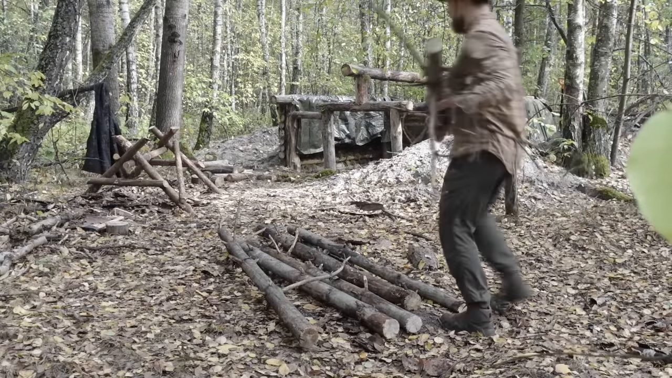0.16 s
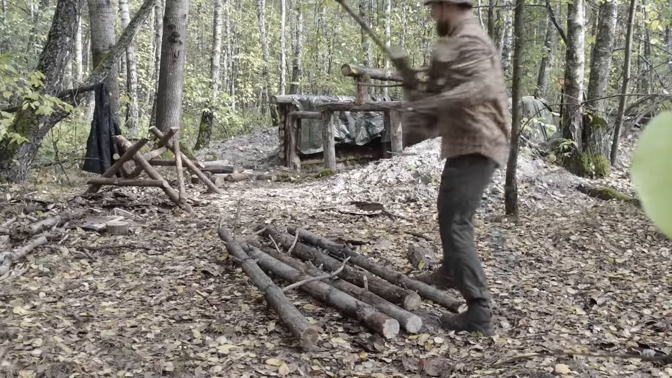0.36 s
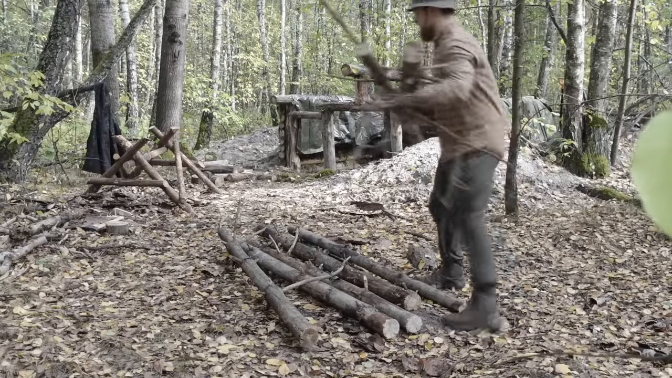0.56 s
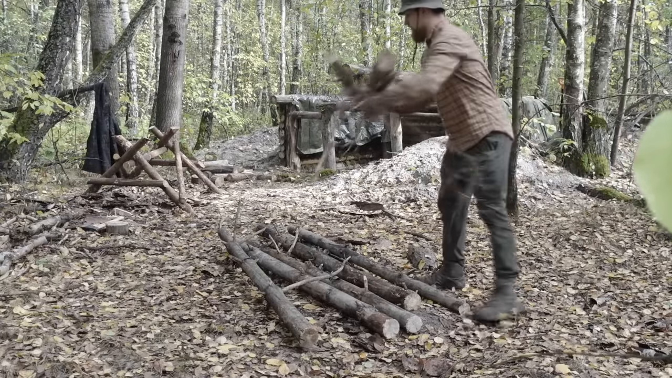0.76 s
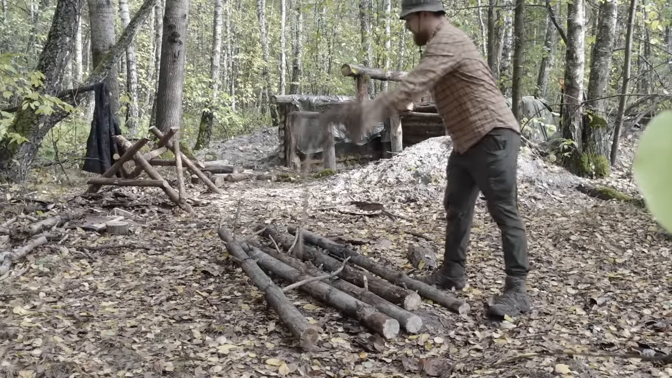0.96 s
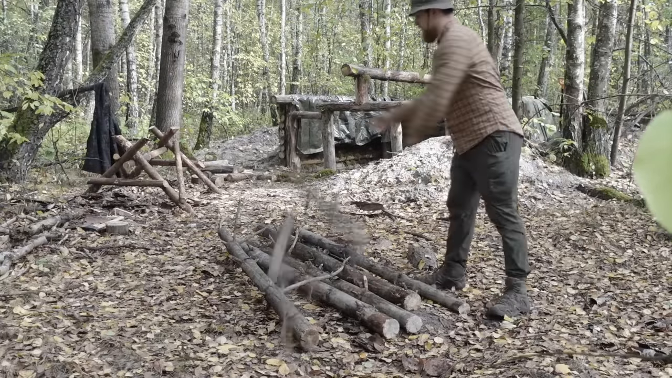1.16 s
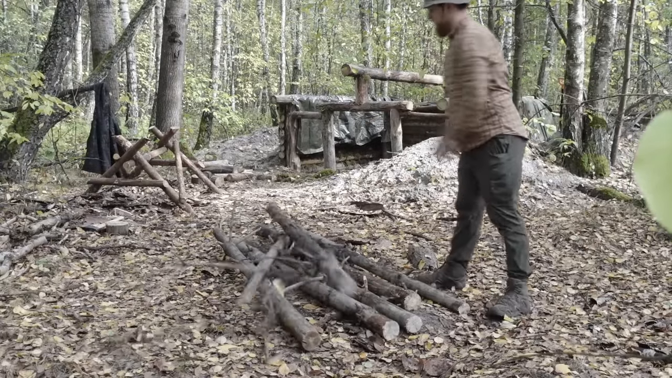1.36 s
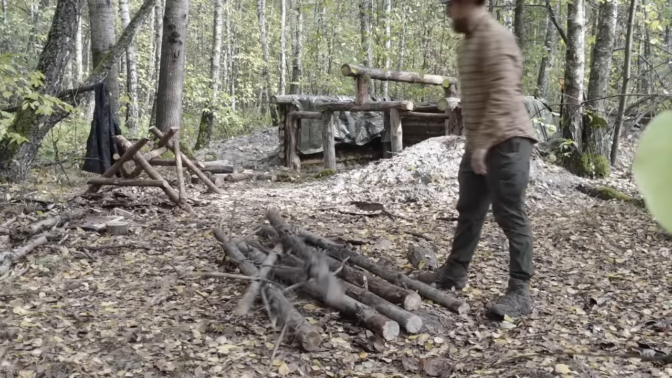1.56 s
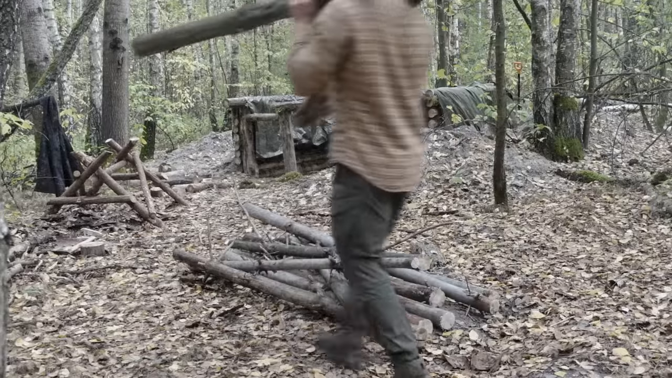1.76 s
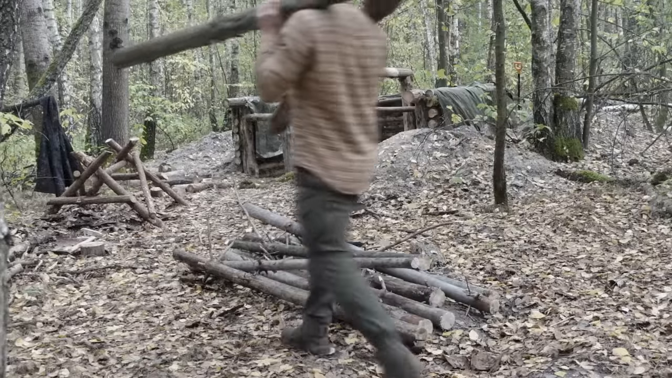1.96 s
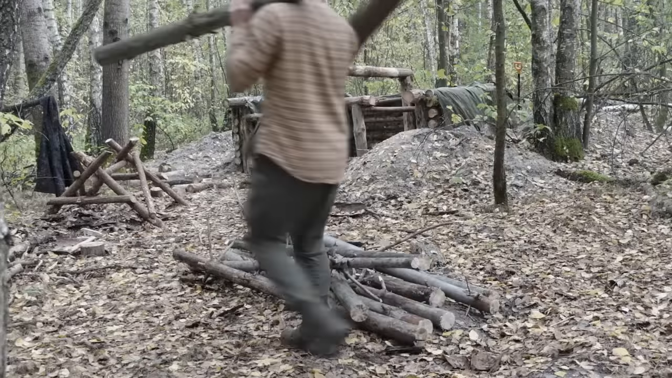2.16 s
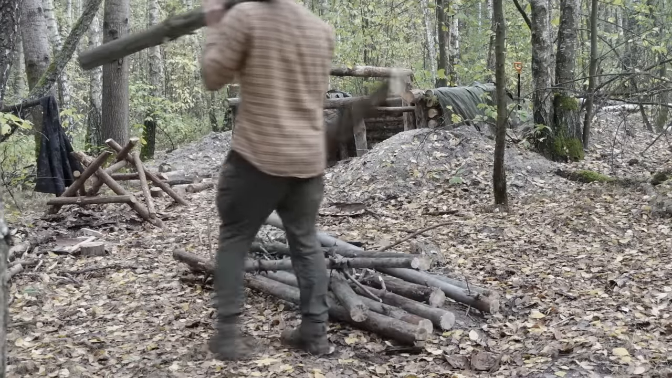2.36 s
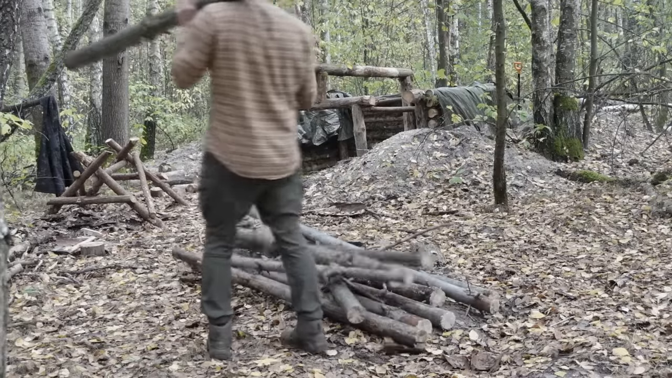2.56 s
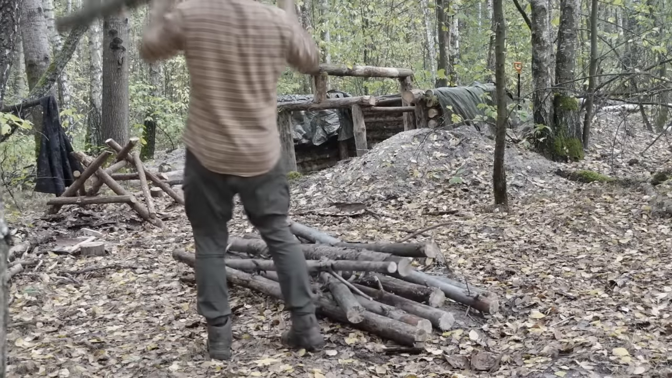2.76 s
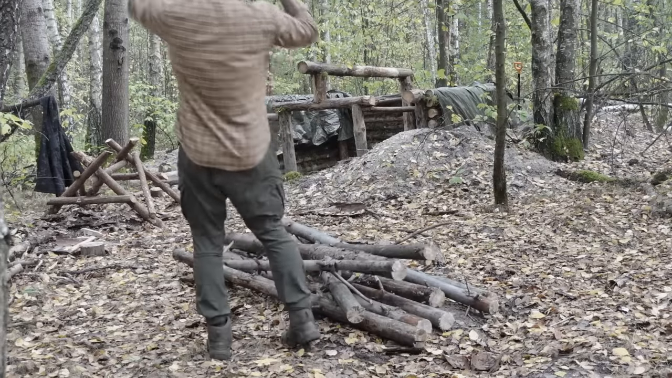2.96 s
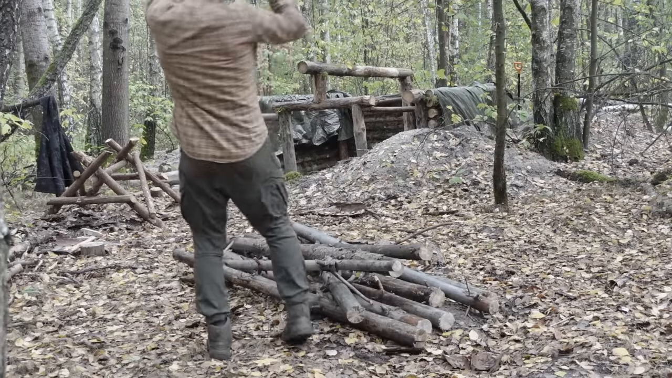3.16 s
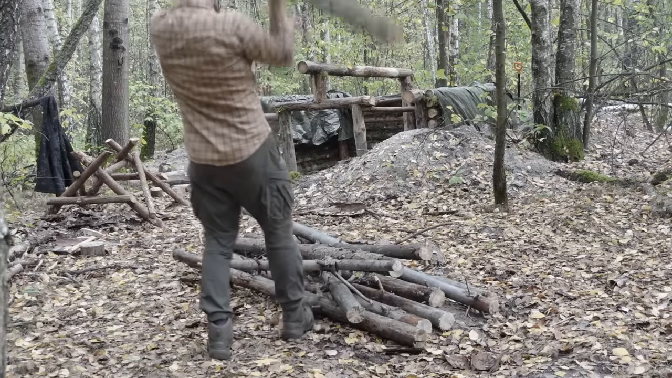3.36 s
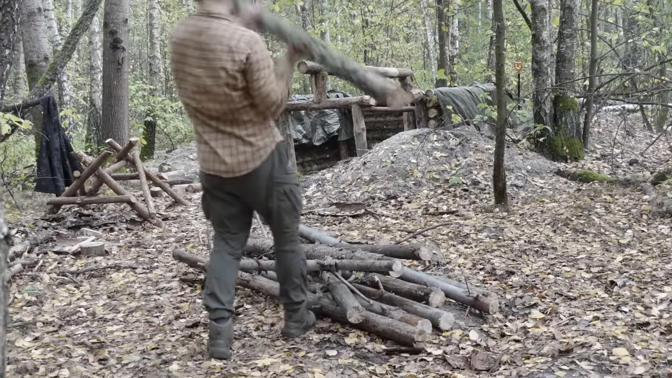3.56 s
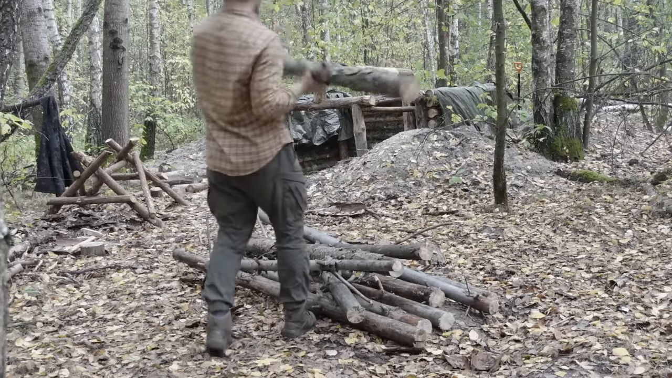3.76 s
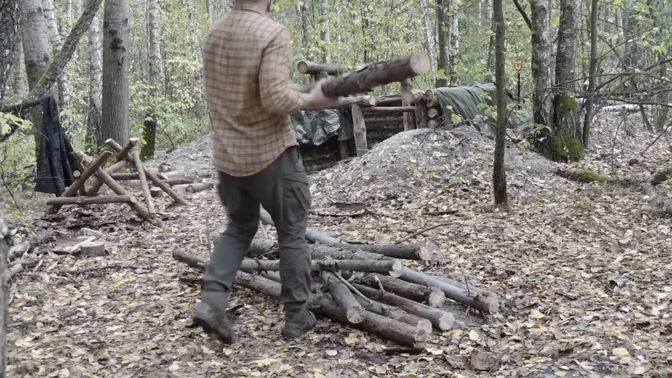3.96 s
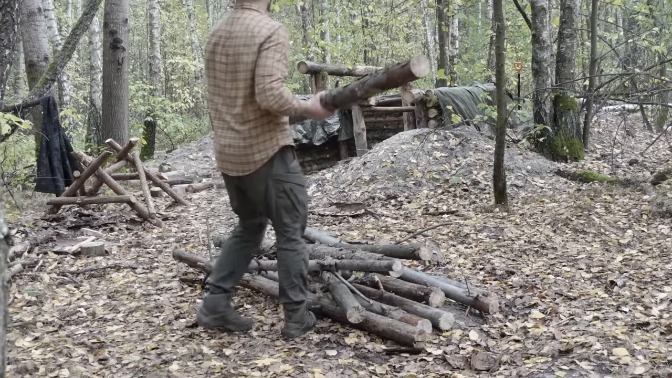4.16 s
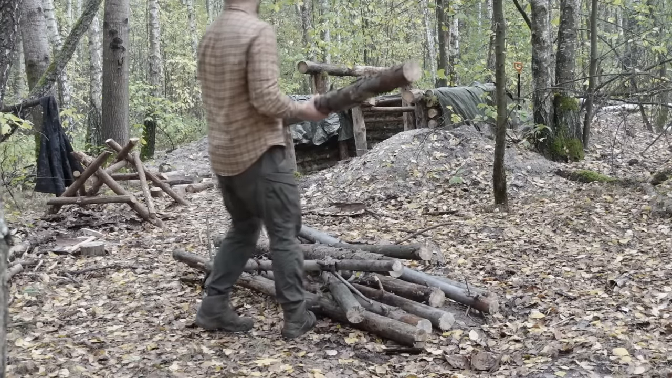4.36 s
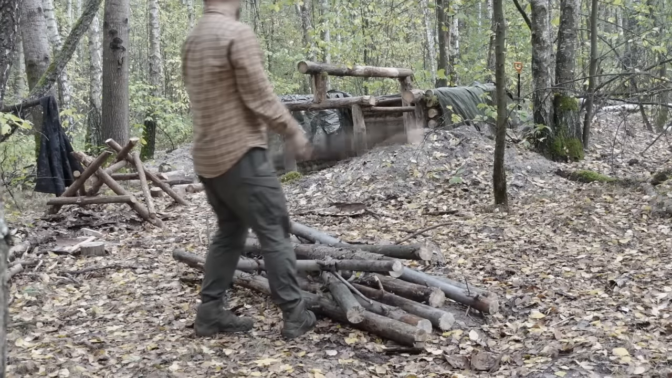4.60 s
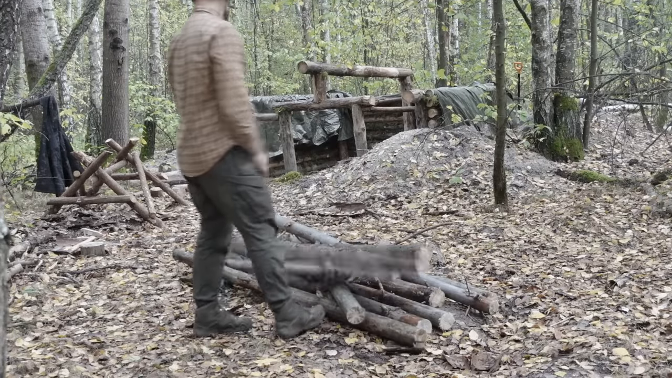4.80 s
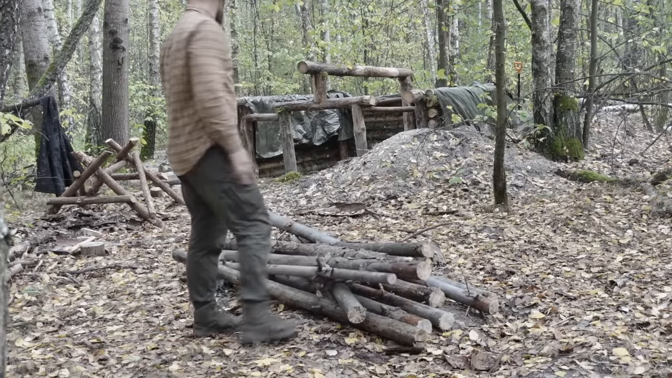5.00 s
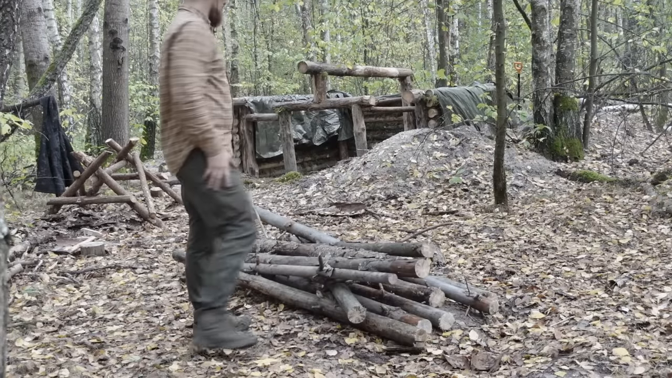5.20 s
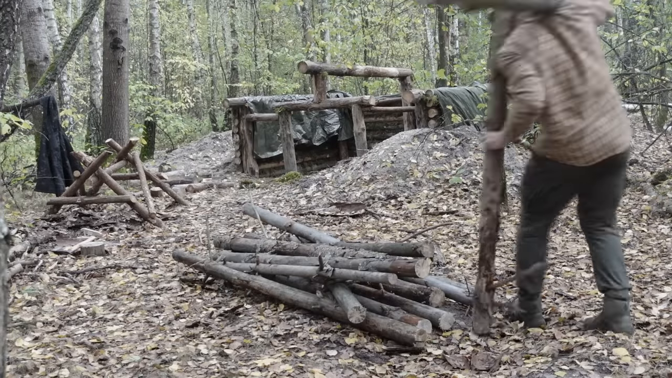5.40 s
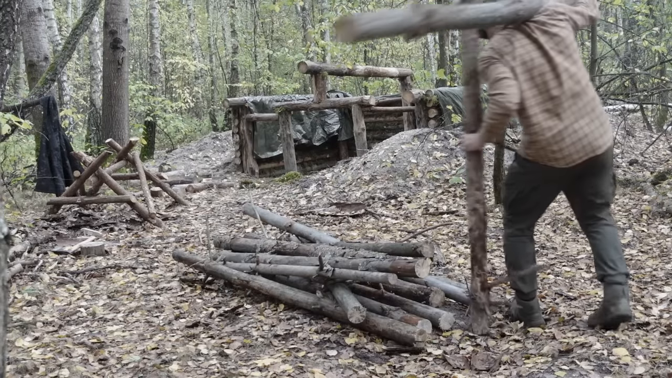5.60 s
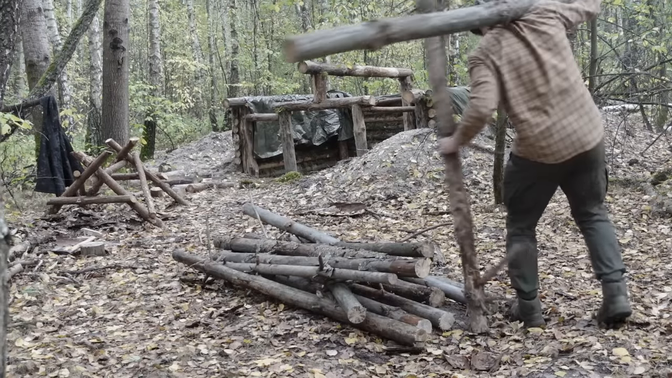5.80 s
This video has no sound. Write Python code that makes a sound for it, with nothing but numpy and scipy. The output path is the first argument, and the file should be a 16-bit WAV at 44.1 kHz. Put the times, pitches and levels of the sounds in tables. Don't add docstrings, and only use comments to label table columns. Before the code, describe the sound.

In a quiet forest, cloth and dry leaves rustle softly with tiny twig ticks. A log crashes onto a log pile with hard hollow knocks and cracking bark, a second lands just over a second later with a lighter touch first, then after a pause of small rustles a third clacks down. Each has a brief tree echo. The microphone is fairly close, mono, with loudest peaks slightly flattened.

```python
import sys
import numpy as np
from scipy import signal
from scipy.fft import rfft, irfft
from scipy.io import wavfile
from scipy.ndimage import uniform_filter1d

SR = 44100
rng = np.random.default_rng(int(sys.argv[2]) if len(sys.argv) > 2 else 0)


def wav_record(signal):
    frames = np.transpose(np.atleast_2d(signal))
    bounded = np.clip(frames, -1, 1)
    quanta = np.round(bounded * 32767).astype(np.int16)
    wavfile.write(sys.argv[1], SR, quanta)


def makeup_ratio(level_db):
    decades = np.asarray(level_db, float) / 20
    return 10 ** decades


N = 257544


def decay(t60_s, length_s):
    return np.exp(-np.log(1000) * np.arange(int(length_s * SR)) / SR / t60_s)


def unit(x):
    return x / np.sqrt(np.mean(x ** 2))


def colour(x, points):
    hz, db = np.transpose(points)
    f = np.maximum(np.arange(len(x) // 2 + 1) * SR / len(x), 1)
    gain = makeup_ratio(np.interp(np.log(f), np.log(hz), db))
    return irfft(rfft(x) * gain, len(x))


def band(x, lo_hz, hi_hz):
    sos = signal.butter(2, [lo_hz, min(hi_hz, .45 * SR)], "band", fs=SR, output="sos")
    return signal.sosfilt(sos, x)


def add(out, start_s, sound):
    i = int(start_s * SR)
    out[i:i + len(sound)] += sound[:len(out) - i]


def curve(tables):
    t = np.arange(N) / SR
    rows = map(np.array, tables)
    return sum(makeup_ratio(np.interp(t, r[:, 0], r[:, 1], -200, -200)) for r in rows)


def walk(rate_hz):
    k = int(SR / rate_hz)
    return uniform_filter1d(np.repeat(rng.standard_normal(N // k + 1), k), k)[:N]


def grains(rate_hz, scatter_db):
    size = makeup_ratio(scatter_db * rng.exponential(size=N)) * rng.standard_normal(N)
    return size * (rng.random(N) < rate_hz / SR)


def choked(table, t60_at_0db_s, gain_per_db):
    return [(*row, t60_at_0db_s * np.exp(-gain_per_db * row[1])) for row in table]


def knocks(table, rise_cycles, pair_db, spread):
    out, t = np.zeros(N), np.arange(SR // 3) / SR
    for (s, db, hz, t60), (a, b, c) in zip(table, rng.random((len(table), 3))):
        push = np.sin(np.pi / 2 * np.minimum(t * hz / rise_cycles, 1)) ** 2
        ratios = (1 + spread * (0.27 + a), 1 - spread * (.4 + b) / 2)
        near = sum(np.sin(2 * np.pi * (hz * ratio * t + c)) for ratio in ratios)
        near = makeup_ratio(pair_db) * near * decay(max(1.4 * t60, .004), 1 / 3)
        ring = np.sin(2 * np.pi * hz * t) + near
        add(out, s, makeup_ratio(db) * push * decay(max(t60, .004), 1 / 3) * ring)
    return out


def cracks(table, spread):
    out, span = np.zeros(N), SR // 10
    rise = np.minimum(np.arange(span) / SR / 0.0013, 1) ** 2
    for (s, db, hz, *treble_db, t60), noise in zip(table, rng.standard_normal((len(table), 2, span))):
        snap = decay(max(.36 * t60, .002), 1 / 10)
        crumble = decay(max(2.2 * t60, .002), 1 / 10)
        burst = unit(band(noise[0], hz / spread, hz * spread)) * (snap + makeup_ratio(-13) * crumble)
        for rel_db in treble_db:
            tick = unit(band(noise[1], 5500, 16500)) * (snap + makeup_ratio(-18) * crumble)
            burst = burst + makeup_ratio(rel_db + 8) * tick
        add(out, s, makeup_ratio(db - 1.4) * rise * burst)
    return out


def pings(table, t60_cycles):
    out, t, rise_s = np.zeros(N), np.arange(SR // 8) / SR, .0006
    rise = np.sin(np.pi / 2 * np.minimum(t / rise_s, 1)) ** 2
    for s, db, hz in table:
        fall_db = 60 * np.maximum(t - rise_s, 0) * hz / t60_cycles
        add(out, s, makeup_ratio(db + 1.5 - fall_db) * rise * np.sin(2 * np.pi * hz * t))
    return out


# start_s, peak_db, ring_hz
LOG_KNOCKS = [(0.46, -35, 670), (1.242, -35, 506), (1.293, -2.5, 502), (1.317, -13.5, 455),
              (1.345, 1.5, 437.4), (1.412, -16, 456), (1.607, -36, 460), (1.662, -42.5, 434),
              (2.53, -19.5, 645), (2.584, -27, 690), (2.623, -5.5, 385), (2.631, -9, 533),
              (2.641, -8.5, 562), (2.652, -14, 407), (2.671, -15, 569), (2.693, -11.5, 421),
              (2.711, -11, 540), (2.789, -24, 346), (2.829, -37, 590), (3.118, -32, 580), (4.896, -9, 600),
              (4.908, -4, 512), (4.925, -7, 706), (4.933, -10, 567), (4.965, -13, 540)]
# start_s, peak_db, ring_hz
LOG_OVERTONES = [(1.24, -35, 755), (1.292, -14, 740), (1.317, -15, 1050), (1.345, -2.5, 800),
                 (1.384, -17, 800), (1.424, -30, 1000), (1.47, -28, 717), (2.533, -21, 880),
                 (2.552, -23, 865), (2.641, -12, 1150), (2.7, -18, 733), (2.75, -35, 840),
                 (2.816, -34.5, 733), (2.919, -38, 814), (4.895, -11, 675), (4.908, -7, 1104),
                 (4.933, -10, 856)]
# start_s, peak_db, ring_hz
END_CLACKS = [(1.263, -31, 1180), (1.294, -22, 1250), (1.3166, -14, 2520), (1.3379, -14.5, 1550),
              (1.351, -13.5, 1650), (1.4691, -22, 1990), (1.4762, -23, 1960), (2.5334, -25, 1230),
              (2.5512, -32, 1190), (2.6201, -9, 1730), (2.697, -17, 1200), (2.6464, -8, 2230),
              (2.6544, -9, 1170), (2.6683, -17, 1440), (2.7134, -5, 1300), (2.7514, -30, 1430),
              (2.817, -31, 1500), (2.8903, -39, 1233), (4.9092, -8.5, 1350), (4.9196, -8.5, 1163),
              (4.9302, -19, 1470), (4.9484, -17, 2486), (4.968, -22, 1260), (2.921, -37, 1400),
              (3.1, -43, 880)]


def log_knocks():
    main = knocks(choked(LOG_KNOCKS, .045, .014), 1.0, -9.5, .2)
    second = knocks(choked(LOG_OVERTONES, .035, .025), 1.4, -2.5, .19)
    ends = knocks(choked(END_CLACKS, .03, .025), 1.3, -2.0, .3)
    return main + second + ends


# start_s, peak_db, ring_hz, t60_s
GROUND_THUMPS = [(0.4435, -31, 560, 0.02), (1.296, -25, 189, 0.1), (1.354, -24, 230, 0.18),
                 (1.371, -14, 98, 0.15), (1.39, -22, 214, 0.27), (1.464, -30.5, 218.5, 0.38),
                 (1.545, -46, 215, 0.37), (1.934, -50, 217, 0.12), (2.52, -27, 221.5, 0.15),
                 (2.551, -28.5, 220, 0.3), (2.628, -18, 241.4, 0.15), (2.664, -28, 227.4, 0.23),
                 (0.46, -37, 300, 0.07), (4.963, -32, 184.4, 0.26)]
# start_s, peak_db, ring_hz, t60_s
LOG_THUDS = [
    (1.291, -17.5, 358, 0.2),
    (1.375, -28, 305, 0.1),
    (2.5205, -14.5, 287, 0.045),
    (2.619, -14.5, 325, 0.068),
    (2.663, -17.5, 240.4, 0.15),
    (2.788, -22, 336, 0.039),
    (3.12, -39, 410, 0.15),
    (4.897, -12, 330, 0.09),
    (5.014, -30, 341, 0.1),
]
# start_s, peak_db, ring_hz, t60_s
FREE_RINGS = [(1.343, -8, 275, .15), (1.357, -9.5, 839, 0.16), (1.351, -10, 443, 0.051),
              (1.378, -3, 453.6, 0.076), (1.47, -27, 500, 0.17), (2.535, -19.5, 3250, 0.027),
              (.465, -39, 520, .09), (2.714, -9, 1960, 0.024), (2.795, -20.5, 494, .06),
              (3.117, -25.5, 1060, 0.055), (3.117, -30, 1490, 0.07), (3.134, -29, 570, 0.09),
              (3.152, -34, 1020, 0.059), (3.152, -40, 1464, .05), (4.95, -5, 540, 0.125),
              (4.945, -23, 350, 0.15)]


def low_thuds():
    thumps = knocks(GROUND_THUMPS, 0.6, -11.5, .35)
    thuds = knocks(LOG_THUDS, 0.57, -13, .15)
    return thumps + thuds + knocks(FREE_RINGS, 2.7, -18.5, .1)


# start_s, peak_db, centre_hz, treble_db
BARK_CRACKS = [(1.209, -26, 4800, -17), (1.2428, -20, 6500, -14), (1.2518, -25, 4200, -35),
               (1.2622, -21, 4500, -21), (1.296, -10, 2440, -20.5), (1.3167, -1, 3300, -15),
               (1.3245, -8, 4000, -19), (1.3376, -8, 2480, -17), (1.354, -2, 5600, -20),
               (1.3614, -8, 5000, -19.5), (1.3763, -13, 6000, -21), (1.461, -19, 3400, -19),
               (1.4685, -16, 2400, -19), (2.5214, -24, 2640, -19), (2.5333, -18, 3060, -24),
               (2.5607, -25, 2720, -26.5), (2.6169, -16, 2550, -17.5), (2.6226, 1.5, 3900, -14),
               (2.6264, -3, 4200, -30), (2.646, -3, 4200, -20), (2.6584, -17, 8650, -6.5),
               (2.663, -10, 3600, -26), (2.6884, -21, 5870, -25), (2.7076, -19, 3600, -18),
               (4.8897, -18, 7000, -14), (4.9097, -6, 3200, -14), (4.9193, 1, 4000, -15),
               (4.9297, -10, 4800, -19), (4.946, -13, 3200, -15), (4.9604, -19, 5000, -14)]
# start_s, peak_db, centre_hz
BARK_SCUFFS = [(0.262, -40.5, 1700), (0.4435, -36, 900), (0.461, -26, 1090), (1.209, -25, 1440),
               (1.224, -28, 2120), (1.242, -24, 1770), (1.665, -31, 1123), (2.52, -16.5, 800),
               (2.544, -23, 2600), (2.707, -12, 2050), (2.714, -14, 1240), (2.748, -30, 1420),
               (2.817, -27, 1600), (2.919, -33.5, 1340), (3.116, -28, 970), (3.152, -34, 1020),
               (3.423, -26, 1970), (4.284, -43.5, 1780), (4.896, -14, 1400), (4.928, -4, 2600),
               (4.935, -6, 895)]
# start_s, peak_db, centre_hz, t60_s
BARK_TICKS = [
    (1.3426, -24, 12600, 0.024),
    (1.3564, -16, 12150, 0.03),
]


def bark():
    snaps = cracks(choked(BARK_CRACKS, .022, .014), 1.62)
    scuffs = cracks(choked(BARK_SCUFFS, .028, .01), 1.75)
    return snaps + scuffs + cracks(BARK_TICKS, 1.25)


# start_s, peak_db, centre_hz, treble_db
TWIG_SNAPS = [(0.0974, -40, 5500, -25), (0.1136, -36, 8360, -18), (0.2014, -49, 2730, -3),
              (0.262, -47, 2820, -2), (0.3844, -47.5, 8220, -21), (0.4612, -32, 2470, -6),
              (1.6076, -30, 2730, -9.5), (2.386, -42, 2560, -7), (3.4232, -34, 3110, -33),
              (3.4357, -31, 2950, -23), (3.4806, -42, 3270, -26), (3.6002, -37, 2750, -6),
              (1.538, -35, 5900, -10), (4.7416, -45, 7220, -13)]


def twigs():
    return cracks(choked(TWIG_SNAPS, .024, .004), 1.62)


# start_s, peak_db, ring_hz
BARK_SPLINTERS = [(.0215, -43, 2000), (.0932, -45, 6600), (.1007, -44, 6800), (.1144, -43, 2400),
                  (.2033, -47, 1500), (.2134, -47, 1800), (.2807, -49, 1900), (.4054, -44, 6000),
                  (1.2265, -35, 2400), (1.2347, -33, 5500), (1.2394, -29, 5000), (1.2524, -22, 4500),
                  (1.2578, -23, 4400), (1.2644, -26, 6100), (1.2755, -29, 8400), (1.3185, -5, 6000),
                  (1.3254, -4, 4700), (1.3292, -19, 5100), (1.3447, -19, 5500), (1.3552, -3, 6100),
                  (1.359, -10, 3300), (1.3778, -19, 6000), (1.3867, -19, 5300), (1.4224, -24, 2800),
                  (1.429, -27, 5600), (1.4727, -18, 2200), (1.4776, -20, 2100), (2.6202, -10, 2500),
                  (2.6202, -20, 8100), (2.632, -14, 3700), (2.6353, -12, 2200), (2.6376, -14, 2400),
                  (2.647, -9, 5900), (2.6592, -13, 8600), (2.6642, -10, 2200), (2.6831, -21, 6000),
                  (2.6892, -18, 5700), (2.7092, -14, 2300), (2.7144, -20, 8700), (4.887, -40, 4500),
                  (4.8938, -24, 7500), (4.8905, -26, 1500), (4.9095, -13, 1550), (4.911, -9, 2300),
                  (4.92, -13, 1600), (4.933, -14, 1450), (4.9216, -9, 5400), (4.9292, -7, 3400),
                  (4.9331, -12, 2800), (4.9508, -15, 2400), (4.9545, -17, 2700), (4.9949, -28, 6700),
                  (5.0004, -27, 3000)]
# start_s, peak_db, ring_hz
DRY_FLAKES = [(1.2264, -50, 12500), (1.234, -45, 12600), (1.2759, -43, 12100), (1.2836, -43, 12400),
              (1.3179, -11, 13600), (1.3179, -12, 15300), (1.318, -12, 8900), (1.3178, -13, 11500),
              (1.3431, -22, 12600), (1.3503, -24, 15000), (1.3554, -15, 12100), (1.3553, -10, 8200),
              (1.3622, -15, 12700), (1.3622, -16, 15000), (1.6088, -33, 8600), (2.3338, -53, 7700),
              (2.6234, -12, 12100), (2.6236, -14, 8600), (2.6474, -23, 14600), (2.6593, -16, 13300),
              (2.6592, -17, 15200), (2.6593, -17, 11300), (2.7142, -22, 12400), (2.7142, -22, 14800),
              (3.9999, -47, 8200), (4.894, -35, 11800), (4.9021, -31, 11900), (4.9165, -29, 13300),
              (4.9201, -13, 13700), (4.9202, -14, 10800), (4.9203, -13, 8400), (4.9299, -22, 12700),
              (4.9452, -27, 13000), (5.212, -50, 8600)]
# start_s, peak_db, ring_hz
LOG_NOTES = [(.462, -43, 1098), (.462, -43, 1814), (3.424, -44, 760), (4.995, -27, 530), (5.06, -37, 520),
             (.463, -46, 1491), (.463, -43, 800), (1.385, -29, 1550), (1.465, -28, 2700),
             (2.64, -20, 1180), (2.71, -19, 2500), (2.815, -36, 1390), (2.815, -38, 1660),
             (4.966, -25, 1450)]


def small_wood():
    return pings(BARK_SPLINTERS, 25) + pings(DRY_FLAKES, 30) + pings(LOG_NOTES, 75)


# ring_hz, t60_s, level_db
PILE_MODES = [(242, 0.05, -9), (426.8, 0.059, 1), (560, 0.13, -4.5), (703, 0.047, 0), (933, 0.021, -2),
              (1250, 0.022, -3.5), (1645, 0.019, -2), (2212, 0.013, -1.5), (2850, 0.017, -11.5),
              (3604, 0.0058, -11)]
# time_s, level_db
PILE_CONTACTS = [
    [(1.2, -76), (1.206, -48), (1.328, -19.5), (1.584, -47.5), (1.67, -62)],
    [(2.519, -42), (2.533, -24), (2.609, -53.5), (2.619, -13), (2.96, -57)],
    [(4.888, -50), (4.891, -32), (4.91, -13.5), (5.1, -52.5)],
]


def rattle():
    t, out = np.arange(SR // 8) / SR, 0
    for hz, t60, db in PILE_MODES:
        mode = np.sin(2 * np.pi * hz * t) * decay(t60, 1 / 8)
        out = out + makeup_ratio(db) * unit(signal.fftconvolve(grains(1200, 0.5), mode)[:N])
    return makeup_ratio(-9.5) * curve(PILE_CONTACTS) * out


# low_edge_hz, quick_db, quick_t60_s, slow_db, slow_t60_s
TRUNK_ECHO = [(700, -20, 0.26, -21.5, 0.87), (1510, -19.5, 0.27, -22, 1.2), (2880, -10.5, 0.47, -21.5, 1.1),
              (5360, -8.5, 0.33, -26.5, 1.6), (11520, -13, .25, -44, .7)]


def trunks(x, t):
    out, change_s, last_s = 0, SCENE_CHANGES[1][0], SCENE_CHANGES[2][0]
    for hz, quick_db, quick_s, slow_db, slow_s in TRUNK_ECHO:
        power, linger = band(x, hz, 2 * hz) ** 2, 0
        for db, t60 in ((quick_db, quick_s), (slow_db, slow_s)):
            keep = np.exp(-2 * np.log(1000) / (t60 * SR))
            for start, end in ((0, change_s), (change_s, last_s)):
                held = signal.lfilter([1 - keep], [1, -keep], power * (t >= start) * (t < end))
                linger = linger + makeup_ratio(2 * db) * held * (t < end)
        late = np.roll(linger, int(.007 * SR))
        out = out + np.sqrt(late) * unit(band(rng.standard_normal(N), hz, 2 * hz))
    return out


def low_echo(x, t):
    noise = band(rng.standard_normal(SR), 150, 800) * np.minimum(np.arange(SR) / SR / 0.015, 1)
    reply = noise * (makeup_ratio(-35) * decay(0.18, 1) + makeup_ratio(-64) * decay(1.1, 1))
    first, later = t < SCENE_CHANGES[1][0], t < SCENE_CHANGES[2][0]
    early_echo = signal.fftconvolve(x * first, reply)[:N] * first
    return early_echo + signal.fftconvolve(x * ~first, reply)[:N] * later


# start_s, level_db, t60_s
GROUND_RUMBLE = [
    (0, -64, 0.39),
    (1.345, -41, 1.1),
    (2.519, -37, 0.87),
    (2.62, -51.5, 1.5),
    (4.9, -49, 1.1),
]


def shudder(t):
    level, change_s = 0, SCENE_CHANGES[1][0]
    for s, db, t60 in GROUND_RUMBLE:
        age = np.maximum(t - s, 0)
        live = (t < change_s) | (s > change_s)
        rise = np.minimum(age / 0.015 + (s == 0), 1)
        level = level + makeup_ratio(db - 60 * age / t60) * rise * live
    return level * unit(band(rng.standard_normal(N), 20, 85))


def swish(t):
    back = .7 * np.exp(-((t - .71) / .06) ** 2)
    forward = np.exp(-((t - .85) / .09) ** 2)
    second = 1.2 * np.exp(-((t - 2.47) / .04) ** 2)
    level = makeup_ratio(-53 + 3.5 * walk(30)) * (back + forward + second)
    return level * unit(band(rng.standard_normal(N), 800, 2200))


# freq_hz, density_db
LEAF_COLOUR = [(180, -15), (300, -6.5), (343, -11), (399, -2.5), (521, -4), (1110, -3), (1240, -3),
               (3450, -10.5), (7300, -9), (8400, -6), (9200, -8), (10400, -15.5), (13400, -8.5),
               (15500, -19), (16300, -37)]
# peak_s,
# treble_db, swell_20db_s, fade_20db_s
MOVEMENTS = [(0.0, -62, .1, .35), (0.11, -62, .06, .08), (0.21, -61, .02, .05), (0.41, -57, .03, .24),
             (0.7, -57, .25, .55), (0.95, -61, .6, .2), (1.255, -46, .04, .12), (1.608, -49, .03, .09),
             (1.908, -48.5, .03, .075), (2.14, -60, .1, .1), (2.48, -51, .17, .2), (3.2, -65, .2, .7),
             (3.45, -63, .08, .45), (3.998, -64, .01, .25), (4.27, -66, .04, .15), (4.528, -66, .01, .12),
             (4.61, -63, .04, .05), (4.75, -65, .08, .25), (4.896, -41, .004, .06), (5.2, -66, .1, .25),
             (5.418, -63, .08, .3), (5.84, -61, .45, .1)]


def rustle():
    grit = 0.33 + uniform_filter1d(np.abs(unit(grains(1900, 1.7))), size=40)
    low, high = (colour(grit * rng.standard_normal(N), LEAF_COLOUR) for _ in range(2))
    low = signal.sosfilt(signal.butter(2, 4500, fs=SR, output="sos"), low)
    high = signal.sosfilt(signal.butter(2, 4000, "high", fs=SR, output="sos"), high)
    t, breeze, power = np.arange(N) / SR, curve(BREEZE_LEVEL), 0
    for s, db, swell_s, fade_s in MOVEMENTS:
        away = np.maximum((s - t) / swell_s, (t - s) / fade_s)
        power = power + makeup_ratio(db - 20 * away) ** 2
    stir = np.sqrt(power)
    treble = np.hypot(stir, makeup_ratio(-82) * breeze)
    middle = np.hypot(makeup_ratio(1.5) * stir, makeup_ratio(-66) * breeze)
    return makeup_ratio(4.5) * treble * unit(high) + makeup_ratio(2) * middle * unit(low)


# freq_hz, density_db
HUSH_COLOUR = [(12, -33.5), (20, -5.5), (55, -2.5), (155, -10), (257, -8.5), (360, -4), (426, -4),
               (504, -2.5), (908, -6.5), (2110, -11), (5780, -13), (12700, -29), (15000, -40.5),
               (16300, -39)]
# time_s, level_db
BREEZE_LEVEL = [
    [(0, -1), (1.2, -3), (1.7, 4), (3.3, 4), (4.8, 3.5), (5.84, 0.5)],
]


def hush():
    swell, breeze, bands = walk(0.7), curve(BREEZE_LEVEL), 0
    for k, hz in enumerate(18 * 2. ** np.arange(10)):
        gain = makeup_ratio(.6 * swell + .9 * walk(7.3)) * (breeze if 3 <= k <= 5 else 1)
        bands = bands + gain * band(rng.standard_normal(N), hz, 2 * hz)
    return makeup_ratio(-56.5) * unit(colour(bands, HUSH_COLOUR))


# centre_s, half_width_s
SCENE_CHANGES = [
    (0.559, 0.0075),
    (1.681, 0.0087),
    (5.461, 0.0067),
]


def dip_at_changes(mix, t):
    for s, half_s in SCENE_CHANGES:
        mix = mix * np.clip(np.abs(t - s) / half_s, .1, 1)
    return mix


# freq_hz, gain_db
MIC_RESPONSE = [(50, -14.5), (150, 1), (6000, -0.5), (9000, 0.5), (10200, -6), (13000, 4.5), (15500, -2)]


def scene():
    t = np.arange(N) / SR
    highs = band(log_knocks() + bark() + twigs(), 260, 17000)
    blows = low_thuds() + highs + rattle() + small_wood()
    heard = colour(blows + trunks(blows, t) + low_echo(blows, t), MIC_RESPONSE)
    mix = heard + shudder(t) + swish(t) + rustle() + hush()
    return dip_at_changes(mix, t)[None]


def low_pass(x):
    return signal.sosfilt(signal.butter(12, 16480, fs=SR, output="sos"), x)


def record(dry):
    x = signal.sosfilt(signal.ellip(8, .2, 60, 15850, fs=SR, output="sos"), dry)
    return low_pass(np.clip(x, -.99, .99))


dry = scene()
out = record(dry)
wav_record(out)
```